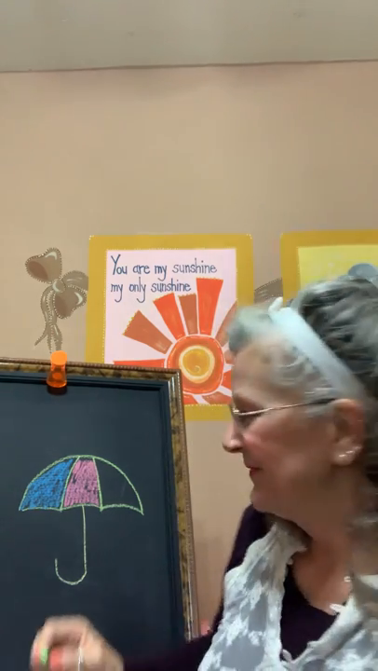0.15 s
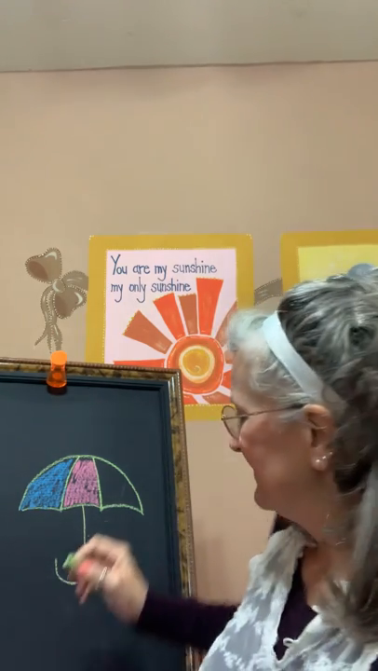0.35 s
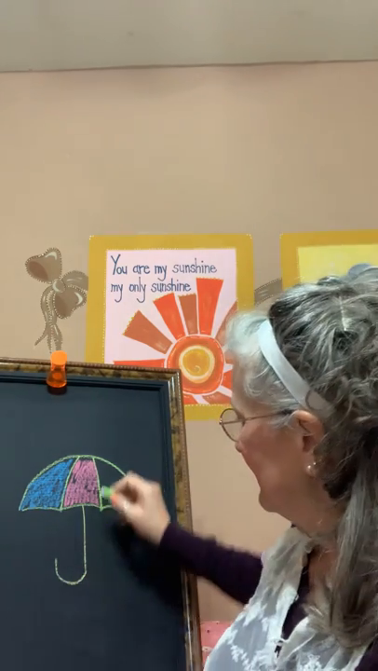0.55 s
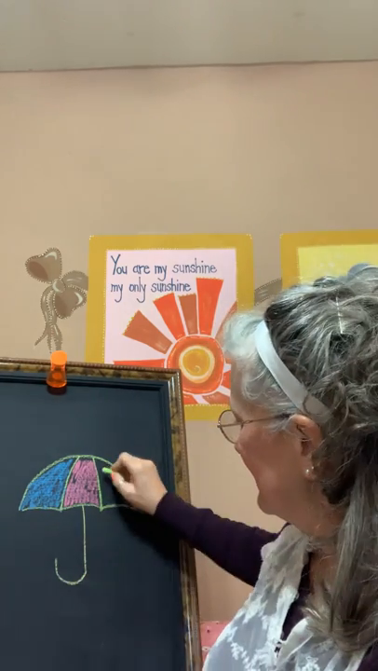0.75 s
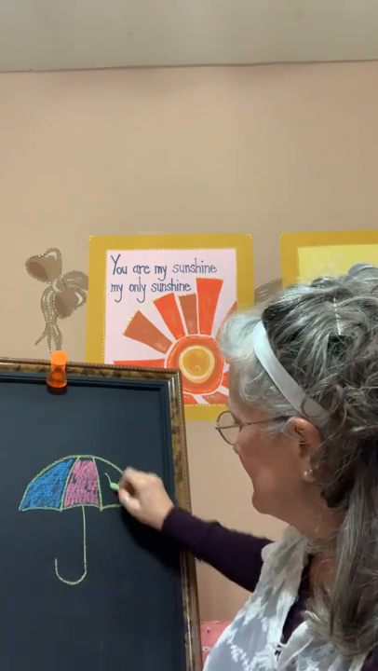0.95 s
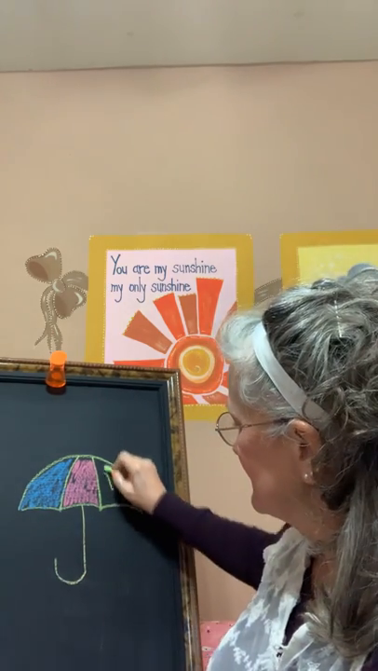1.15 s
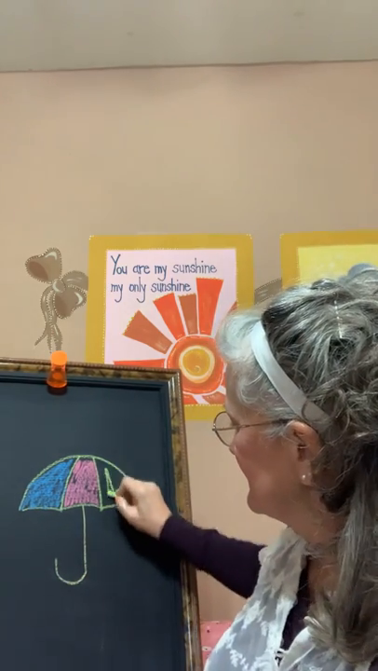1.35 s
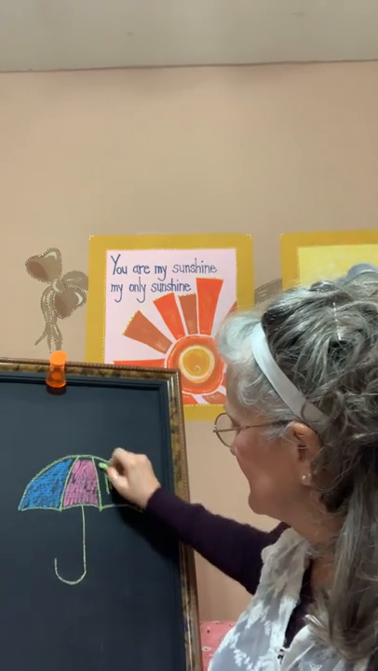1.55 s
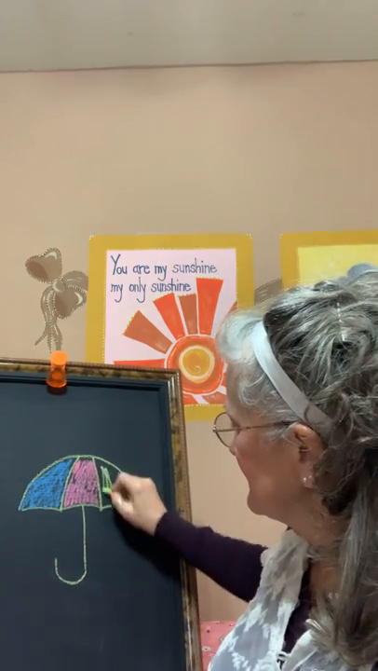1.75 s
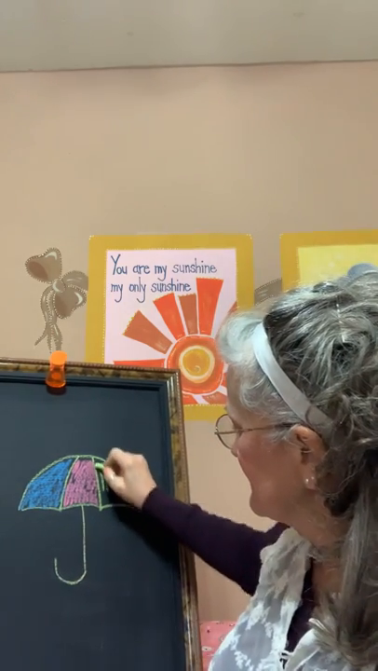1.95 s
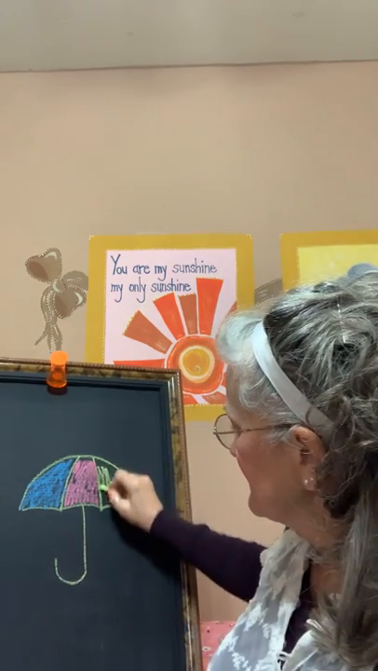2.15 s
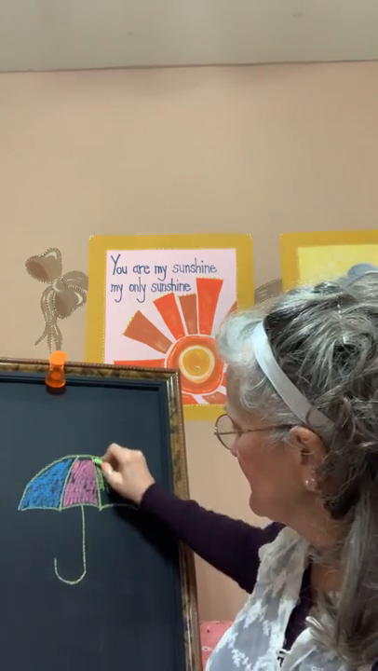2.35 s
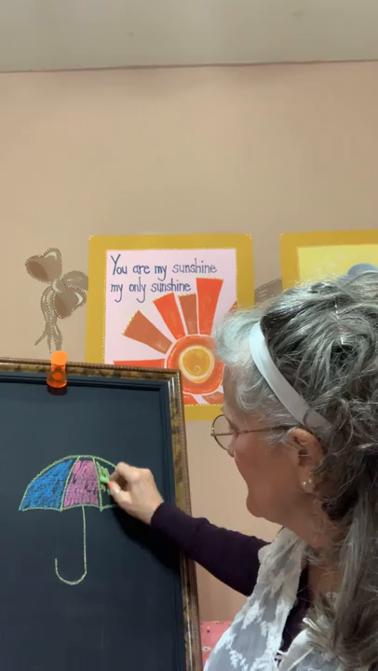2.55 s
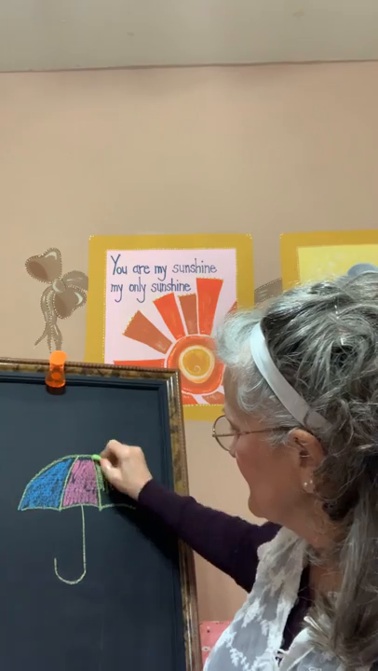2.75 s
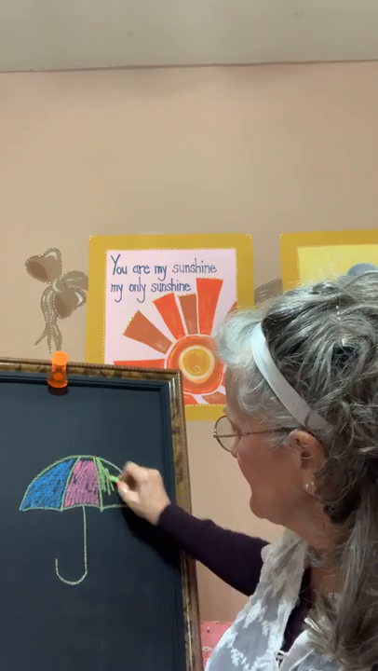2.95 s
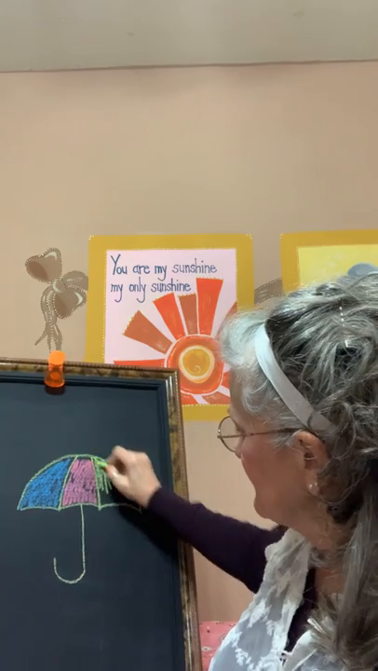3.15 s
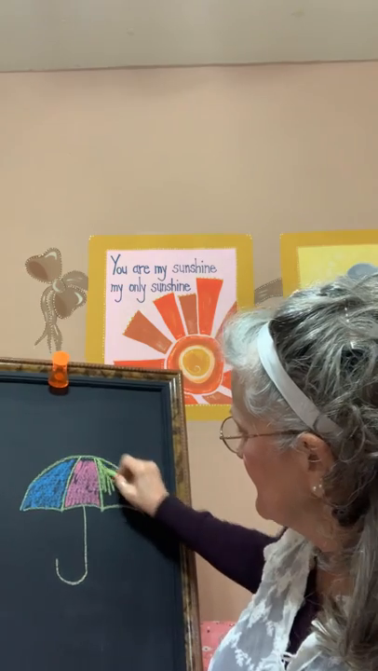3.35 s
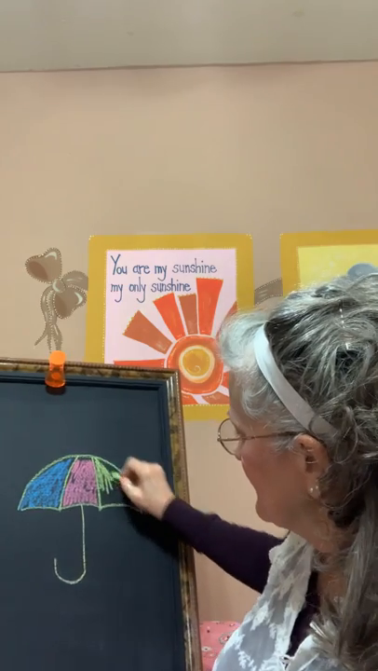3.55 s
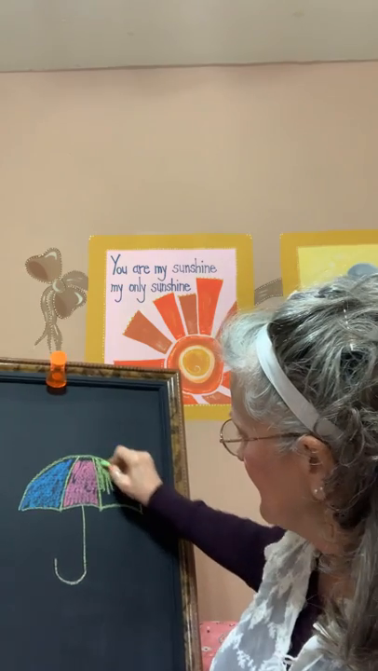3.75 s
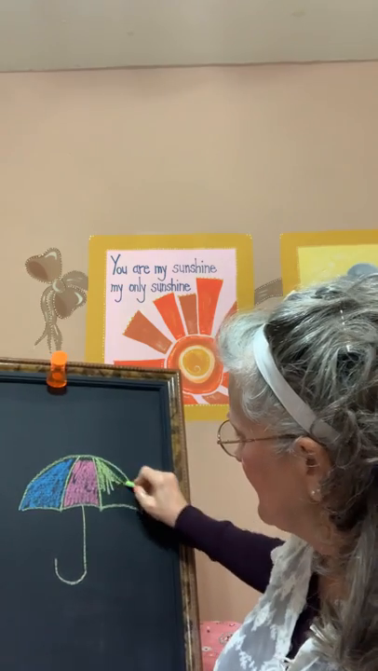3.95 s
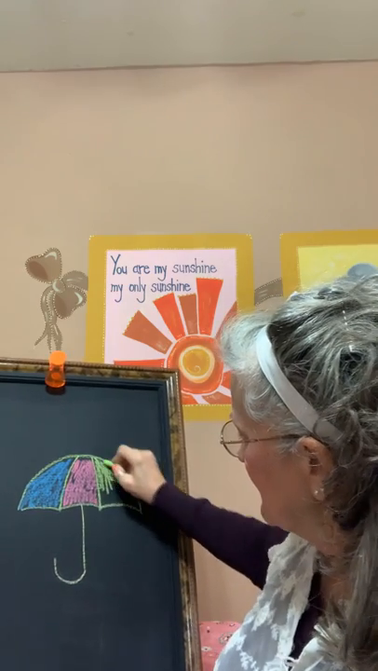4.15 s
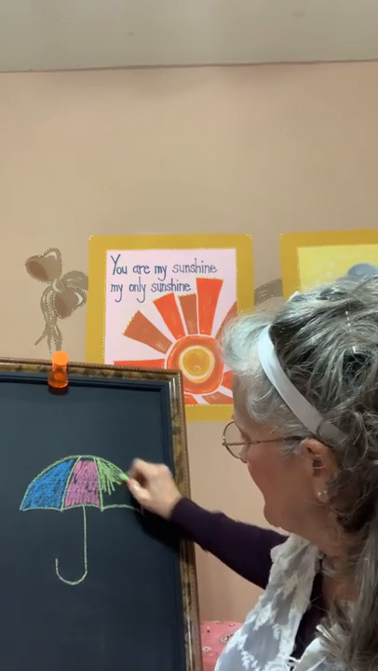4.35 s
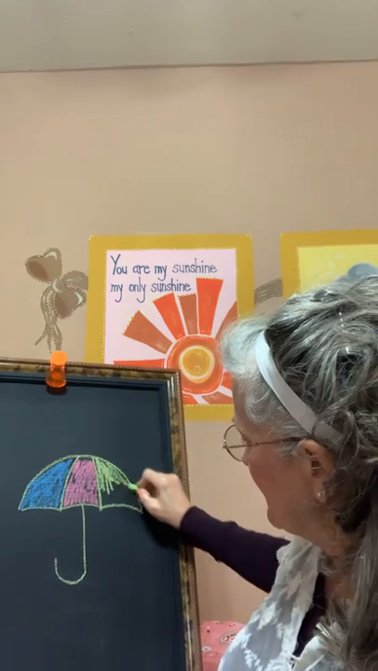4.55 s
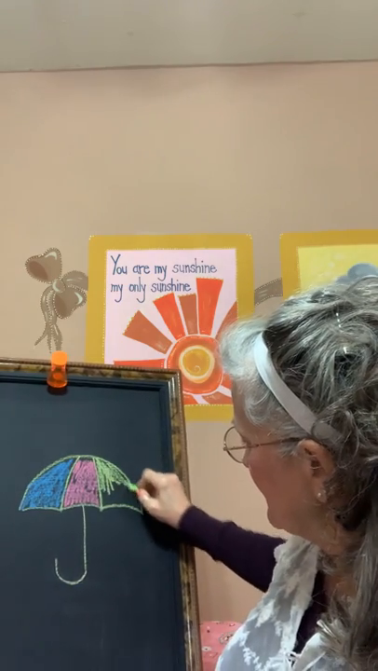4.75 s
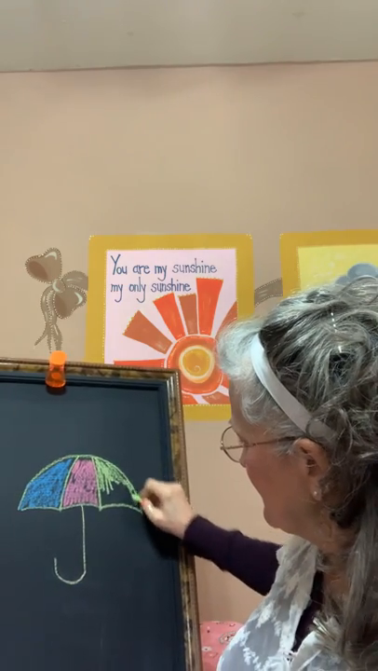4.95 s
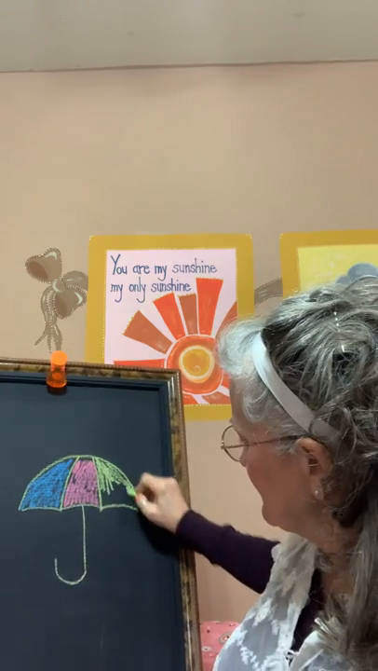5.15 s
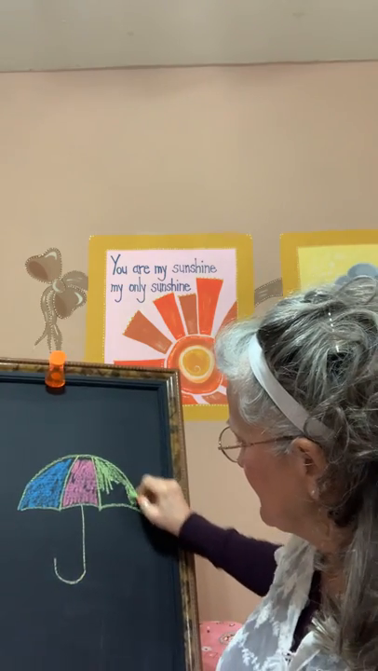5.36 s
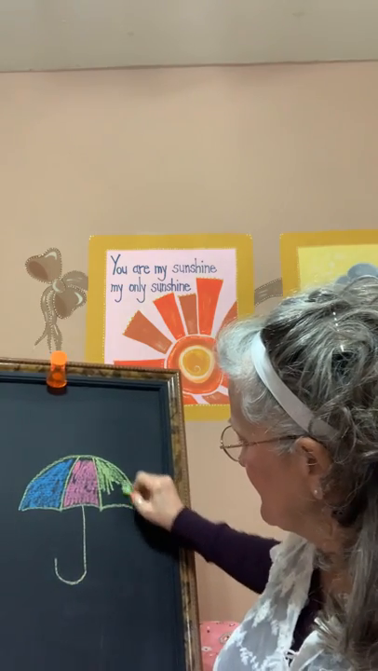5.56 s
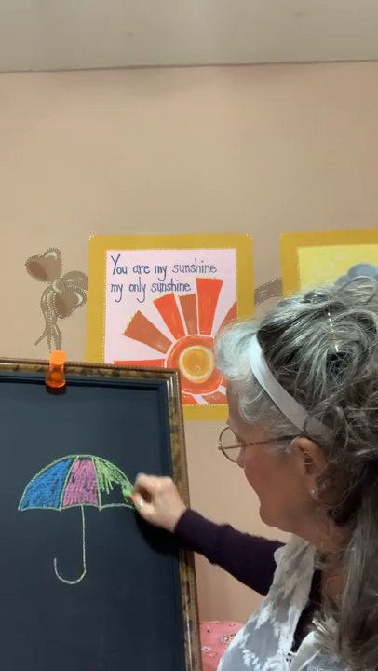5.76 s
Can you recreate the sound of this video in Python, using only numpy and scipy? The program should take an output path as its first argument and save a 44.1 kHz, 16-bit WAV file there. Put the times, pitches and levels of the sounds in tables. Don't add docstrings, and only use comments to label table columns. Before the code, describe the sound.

Cloth brushes briefly, chalk knocks onto a board, and brisk alternating strokes follow, light hiss answered by a booming, juddering scrape, in a quiet room.

```python
import sys
import numpy as np
from scipy import signal
from scipy.io import wavfile
from scipy.ndimage import uniform_filter1d

SR = 44100
rng = np.random.default_rng(int(sys.argv[2]) if len(sys.argv) > 2 else 0)


def volts_from_db(level):
    exponent = np.asarray(level, float) / 20
    return 10 ** exponent


def put_to_file(sound):
    columns = np.atleast_2d(sound).T
    safe = np.clip(columns, -1, 1)
    whole_steps = np.round(safe * 32767)
    wavfile.write(sys.argv[1], SR, whole_steps.astype(np.int16))


N = 256662

# (turn time [s], sink of speed at the turn [dB], grit level [dB], treble [dB], pressure [dB])
STROKES = [(0.903, -7.5, -58, -14.5, -66), (1.08, -14.5, -60, -9.5, -48), (1.258, -9, -58.5, -8, -57),
           (1.449, -6, -57.5, -13, -47.5), (1.631, -12, -56.5, -8.5, -54), (1.823, -13, -60, -11.5, -45),
           (2.026, -9.5, -55.5, -11, -55), (2.205, -18, -57, -11.5, -46), (2.449, -18, -59.5, -9, -57.5),
           (2.628, -31, -59, -12.5, -40.5), (2.845, -28, -58.5, -6.5, -55), (3.084, -11, -59, -12, -42.5),
           (3.307, -16, -58, -9.5, -52.5), (3.549, -17, -56.5, -10.5, -43.5), (3.784, -14, -56, -8, -55.5),
           (4.028, -16.5, -55.5, -9.5, -44), (4.281, -20, -56, -7.5, -60.5), (4.567, -12.5, -60, -25, -47),
           (4.745, -11.5, -59.5, -11.5, -58), (4.96, -10, -57, -21.5, -44.5),
           (5.154, -11, -59, -12.5, -60.5), (5.345, -13.5, -56.5, -16, -46), (5.545, -9.5, -57, -12, -61),
           (5.746, -12, -56, -21, -49)]
LAST_TURN_S = 5.93
FASTEST_SHARE = (0.54, 0.47)
LEAN_DB = [2.5, -.3, -4.5, 2, -0.5, -1.5, 3, -5.8, 1, -1, 1, -2, 4, -2.5, 3, -6, 3.5, -1.5, -1, 2.5, -5.5,
           2.2, -4.3, 7]
# (frequency [Hz], level [dB])
GRIT_COLOUR = [(300, -6.5), (900, -4), (1800, -4), (2600, -1.5), (3700, -0.5), (5000, -4.5), (7000, -5),
               (9500, -6.5), (11800, -13), (12800, -16), (13800, -17), (16000, -18)]
# (frequency [Hz], share [dB per dB])
TREBLE_SHARE = [(3000, 0.0045), (6000, 0.41), (9000, 1.16), (12000, 0.92), (16000, 1)]
# (frequency [Hz], exponent of speed [-])
SPEED_POWER = [(1000, 0.88), (3500, 1.45), (7000, 1.92), (11000, 2.36), (16000, 2.3)]
# (time [s], level of the highest hiss [dB])
DUST_FINENESS = [(.9, 3.5), (2.1, 3), (2.6, -4.5), (3.3, 0.5), (4.1, 3), (4.7, 8), (5.2, 2), (5.6, 9),
                 (5.82, -3)]
# (frequency [Hz], share [dB per dB])
FINENESS_SHARE = [(9000, 0.11), (12500, 0.9), (16000, 1.1)]

# (slack after the turn [s], slack level [dB], bite after the turn [s], bite level [dB],
#  let-go before the next turn [s], let-go level [dB])
JUDDER_SHAPE = [(0.038, -6.5, 0.15, -0.5, .07, -0.5), (0.0036, -22.5, 0.025, -3.5, 0.054, 1.5)]
SCRAPE_SHAPE = [(0.0019, -7, 0.086, -2, 0.07, .5), (.001, -22.5, 0.049, -2, 0.066, 1.9)]
ROCK_SHAPE = [(.06, -6, .1, -5, 0.076, -1.5), (.001, -10, 0.11, 0, 0.054, -0.25)]
# (frequency [Hz], level [dB])
JUDDER_COLOUR = [(90, -40.5), (160, -1), (220, -1.5), (290, -2), (420, 0), (600, -20.5), (1000, -15.5),
                 (2000, -70.5)]
SCRAPE_COLOUR = [(250, -42.5), (500, 7), (800, 2.5), (1400, -3), (2200, -5.5), (4000, -57.5)]
ROCK_COLOUR = [(25, -39), (55, -17), (85, 0), (120, 7.5), (150, 1), (250, -66)]
FIRM_DB = -46
# (time [s], upper minus deep level [dB], scrape level [dB], rock level [dB], swell [dB])
PLACE = [(.85, -23, -9, 3, 11), (1.18, -2, -2, 0.5, -1), (1.53, -5, 3, 6.5, -1.8), (1.95, -4, 0.5, -2, 1),
         (2.14, 5, 4.5, -0.5, -3), (2.32, -2, -2, -2, -0.2), (2.57, 1.5, 1, -4, 1), (2.74, 3, -3, -1, -0.5),
         (3.2, -5, 3, -1.2, 0), (3.42, 0.5, -3.8, 2, -3.5), (3.6, -3, 1, -.3, 0), (3.74, -5, 0.8, -.3, 1.5),
         (4.14, -0.5, 0.8, -1.5, -2), (4.65, 6, -5, -5, -2.5), (5.06, -1, -1.2, -2, 2.6),
         (5.27, 9, -3.5, 1, 1), (5.45, 3.5, -3, -1.5, -1.1), (5.8, 13, 0, -1, 0.5)]

# (time [s], level [dB])
TAPS = [
    (.8852, -31),
    (.8935, -50),
    (1.389, -36.5),
]
# (time [s], peak level [dB])
CATCHES = [(1.092, -37), (1.449, -32), (1.713, -33), (1.832, -36.5), (2.249, -40), (2.486, -34.5),
           (2.654, -33), (3.1, -35.5), (3.326, -44), (3.564, -35), (4.035, -39), (4.572, -37),
           (4.972, -34.5), (5.365, -36.5), (5.763, -48), (5.779, -55)]
# (frequency [Hz], level [dB])
TAP_COLOUR = [(60, -20), (110, 3.5), (200, -5), (450, -9), (900, -1.5), (1400, -5.5), (1800, -7.5),
              (2600, -14), (3100, -26), (3700, -29), (6000, -35), (16000, -45)]
CATCH_COLOUR = [(100, -25), (250, -3), (450, 0), (900, -6), (1400, -12), (2500, -22), (5000, -40),
                (16000, -75)]

# (frequency [Hz], bandwidth [Hz], lift [dB])
PANEL_MODES = [(92, 12, 8), (114, 12, 6), (204, 30, 11), (258, 24, 4), (313, 28, 5), (393, 24, 7),
               (506, 34, 5), (535, 27, 4), (678, 27, 7), (733, 27, 7), (805, 27, 6), (877, 36, 5),
               (1010, 50, 4), (1173, 22, 8), (1381, 50, 10), (1620, 50, 3), (1735, 35, 5), (1779, 30, 6),
               (2056, 40, 5), (2305, 40, 6), (2380, 40, 4), (2594, 40, 5), (2810, 40, 6), (3046, 80, 4),
               (3283, 45, 4), (3488, 45, 4), (3690, 90, 5), (3955, 60, 3), (4550, 50, 3), (6310, 60, 3)]

# (time [s], swish level [dB], dull rub level [dB])
SLEEVE = [
    (0.0, -62, -59),
    (0.06, -64.5, -63.5),
    (0.09, -67.5, -66),
    (0.12, -63.5, -65.5),
    (0.294, -64.5, -58.5),
    (0.34, -68, -62),
    (0.47, -73.5, -61),
    (0.51, -77, -70),
    (0.7, -82.5, -95),
]
# (time [s], level [dB])
SEAMS = [
    (.002, -57.5),
    (.056, -61.5),
    (.1, -69),
    (.37, -66),
    (.492, -67.5),
]
# (frequency [Hz], level [dB])
SWISH_COLOUR = [(700, -1), (1500, -5.5), (3000, -7.5), (5500, -10), (7000, -18), (12000, -28)]
RUB_COLOUR = [(40, -35), (70, -6.5), (110, 2.5), (200, -4.5), (330, -4.5), (470, -8.5), (650, -21),
              (1500, -48)]
RASP_COLOUR = [(350, -27), (620, 0), (780, -6), (940, 3), (1100, -7), (1700, -12), (3000, -48)]

# (frequency [Hz], level [dB])
AIR_COLOUR = [(15, -59), (30, -30), (70, -1.5), (95, -1.5), (113, 7.5), (135, -8.5), (200, -19),
              (420, -19.5), (680, -11.5), (800, -18.5), (1500, -24), (2500, -36), (7000, -33.0),
              (13500, -31.0), (14600, -51), (16000, -62)][1:-1]


def grit(per_s=9000, spread_db=-0.5, patchy_db=2.5, trim_db=-2):
    turn, stop_db, grit_db, treble_db = np.transpose(STROKES)[:4]
    fastest = turn + np.resize(FASTEST_SHARE, len(turn)) * np.diff(turn, append=LAST_TURN_S)
    grains = coloured(slips(per_s, spread_db), GRIT_COLOUR)
    hz, t, z = signal.stft(grains, SR, nperseg=256, noverlap=192)
    middle = z[(hz > 2000) & (hz < 5000)]
    z /= np.sqrt(np.mean(abs(middle) ** 2) * 17 * 1.33)

    swing = np.interp(t, np.ravel([turn, fastest], "F"), np.arange(2 * len(turn)) / 2)
    slowest = volts_from_db(np.interp(t, turn, stop_db))
    touching = t > turn[0] - .012
    speed = np.hypot(np.sin(np.pi * swing), slowest) * touching + 1e-5

    lean_db = np.array(LEAN_DB)[swing.astype(int)] * (2 * (swing % 1) - 1)
    bright_db = np.interp(t, fastest, treble_db) + 7 - 0.4 * lean_db
    tilt_db = np.outer(read(TREBLE_SHARE, hz), bright_db)
    tilt_db += np.outer(read(FINENESS_SHARE, hz), np.interp(t, *np.transpose(DUST_FINENESS)))

    patches = uniform_filter1d(rng.standard_normal(z.shape), size=2, axis=0)
    patches = evened(uniform_filter1d(patches, size=30, axis=1))
    z *= volts_from_db(np.interp(t, fastest, grit_db) + lean_db + tilt_db + patchy_db * patches + trim_db)
    z *= speed ** read(SPEED_POWER, hz)[:, None]
    return signal.istft(z, SR, nperseg=256, noverlap=192)[1][:N]


def judder(split_hz=255):
    shake = evened(coloured(slips(700, spread_db=3.0), JUDDER_COLOUR))
    deep = signal.lfilter(*signal.butter(3, split_hz, fs=SR), shake)
    upper = signal.lfilter(*signal.butter(3, split_hz, "high", fs=SR), shake)
    balance = level(PLACE) ** .5 + 1e-2
    return (deep / balance + upper * balance) * pressed(JUDDER_SHAPE) * volts_from_db(-5)


def scrape():
    force = evened(coloured(slips(2500, spread_db=1.5), SCRAPE_COLOUR))
    pressure = pressed(SCRAPE_SHAPE, firm_db=-49.5, follows=0.49)
    return force * pressure * level(PLACE, column=2) * volts_from_db(-7.5)


def rock():
    force = evened(coloured(rng.standard_normal(N), ROCK_COLOUR))
    pressure = pressed(ROCK_SHAPE, firm_db=-50, follows=0.87)
    return force * pressure * level(PLACE, column=3) * volts_from_db(-9.5)


def pressed(shape, firm_db=FIRM_DB, follows=1):
    turn, pressure_db = np.transpose(STROKES)[[0, 4]]
    slack, slack_db, bite, bite_db, go, go_db = np.resize(shape, (len(turn), 6)).T
    let_go = np.append(turn[1:], LAST_TURN_S) - go
    s = np.transpose([turn + slack, turn + bite, let_go]).ravel()
    swell_db = np.interp(turn + bite + 0.14, *np.transpose(PLACE)[[0, 4]])
    shape_db = np.array([slack_db, bite_db - swell_db, go_db + swell_db])
    db = firm_db + follows * (pressure_db - FIRM_DB) + shape_db
    return level(np.transpose([np.maximum.accumulate(s), db.T.ravel()]))


def taps():
    blows = knocks(TAPS, TAP_COLOUR, t60=0.22, rise=0.0002)
    catches = knocks(CATCHES, CATCH_COLOUR, t60=0.21, rise=0.001)
    return blows + volts_from_db(-3.5) * catches


def knocks(rows, colour, t60, rise):
    t, out = np.arange(SR // 5) / SR, np.zeros(N + SR)
    rattles = rng.standard_normal((len(rows), len(t)))
    for (s, db), rattle in zip(rows, rattles):
        rattle = rattle * volts_from_db(db - 60 * t / t60) * (1 - np.exp(-t / rise))
        out[round(s * SR):][:len(t)] += rattle
    return coloured(out[:N], colour)


def board(force, dense_db=-7, dense_t60=0.043, dense_hz=(1200, 9000), shifts_per_s=1.7):
    t = np.arange(SR // 3) / SR
    ring = np.zeros(len(t))
    for hz, width, db in PANEL_MODES:
        decay = 2 * np.pi * width / SR * np.exp(-np.pi * width * t)
        ring += (volts_from_db(db) - 1) * decay * np.cos(2 * np.pi * hz * t)
    ring[0] += 1
    out = signal.oaconvolve(force, ring)[:N]
    band = signal.butter(1, dense_hz, "band", fs=SR)
    for third, noise in enumerate(rng.standard_normal((3, len(t)))):
        dense = signal.lfilter(*band, noise) * volts_from_db(-60 * t / dense_t60)
        phase = 2 * np.pi * (shifts_per_s * np.arange(N) / SR + third / 6)
        share = np.sqrt(2 / 3) * np.cos(phase)
        out += signal.oaconvolve(force * share, volts_from_db(dense_db) * dense / np.linalg.norm(dense))[:N]
    return out


def sleeve(seam_fade_db_per_s=422):
    swish = evened(coloured(slips(6000, spread_db=1.5), SWISH_COLOUR)) * level(SLEEVE)
    rub = evened(coloured(slips(900, spread_db=4.0), RUB_COLOUR)) * level(SLEEVE, column=2)
    rasp = evened(coloured(slips(3000, spread_db=5.0), RASP_COLOUR))
    t = np.arange(N) / SR
    rasp *= sum(volts_from_db(db - seam_fade_db_per_s * abs(t - s)) for s, db in SEAMS)
    return swish + rub + rasp


def room(x, t60=0.1, damping_hz=(260, 5000)):
    echoes = np.zeros(SR // 2)
    at = np.arange(200, len(echoes) - 22, 22)
    late = rng.integers(0, 22, len(at))
    echoes[at + late] = rng.choice([-1., 1.], len(at)) * volts_from_db(-60 * at / SR / t60)
    echoes = signal.lfilter(*signal.butter(1, damping_hz, "band", fs=SR), echoes)
    return signal.oaconvolve(x, echoes / np.linalg.norm(echoes))[:N]


def still_air():
    return volts_from_db(-74) * evened(coloured(rng.standard_normal(N), AIR_COLOUR))


def slips(per_s, spread_db):
    draw = rng.random(N)
    size = np.minimum(rng.exponential(1, N), 4)
    sign = rng.choice([-1., 1.], N)
    return evened((draw < per_s / SR) * volts_from_db(spread_db * size) * sign)


def coloured(x, colour):
    gain = np.log(volts_from_db(read(colour, abs(np.fft.fftfreq(8192, 1 / SR)))))
    taps = np.fft.ifft(np.exp(np.conj(signal.hilbert(gain)))).real[:4096]
    return signal.oaconvolve(x, taps)[:N]


def level(rows, column=1):
    rows = np.array(rows)
    t = np.arange(N) / SR
    return volts_from_db(np.interp(t, rows[:, 0], rows[:, column], left=-120, right=rows[-1, column]))


def read(points, hz):
    f, value = np.transpose(points)
    return np.interp(np.log(hz + 1), np.log(f + 1), value)


def evened(x):
    return x / np.sqrt(np.mean(x ** 2) + 1e-20)


def scene():
    force = grit() + judder() + scrape() + rock() + taps()
    near = board(force) + sleeve()
    return (near + volts_from_db(-14) * room(near) + still_air())[None]


def band_limit(x):
    return signal.sosfilt(signal.butter(12, 15680, fs=SR, output="sos"), x)


def record(dry):
    edge = signal.firwin(1023, 15790, window=("kaiser", 9), fs=SR)
    mix = signal.oaconvolve(dry, edge[None], "same")
    return band_limit(mix)


dry = scene()
out = record(dry)
put_to_file(out)
```